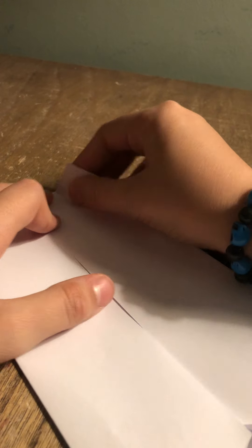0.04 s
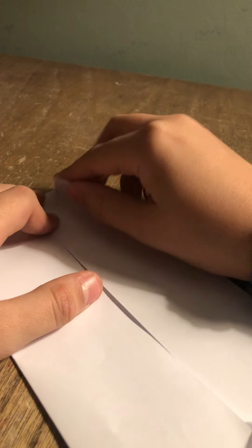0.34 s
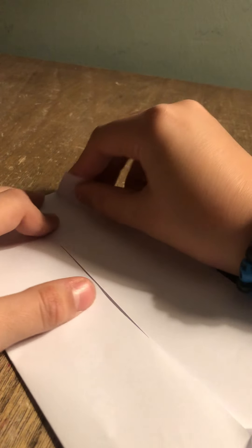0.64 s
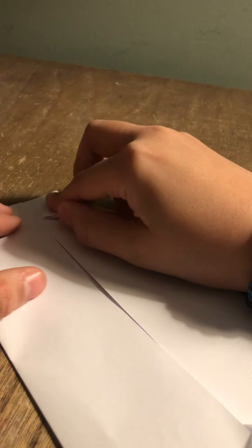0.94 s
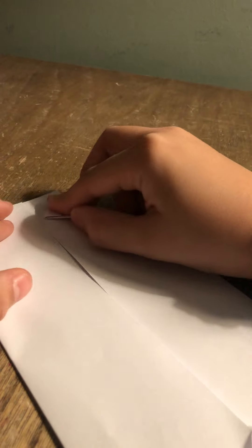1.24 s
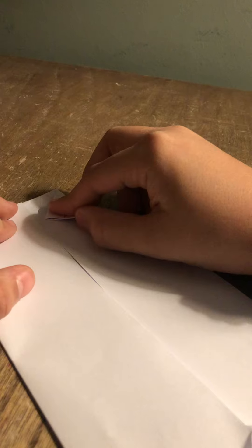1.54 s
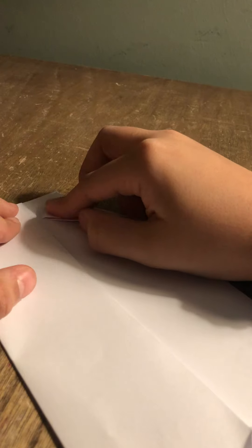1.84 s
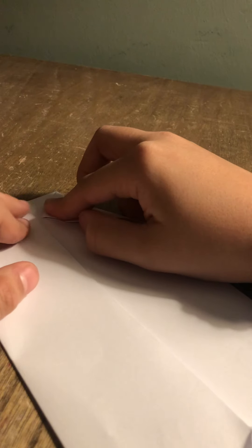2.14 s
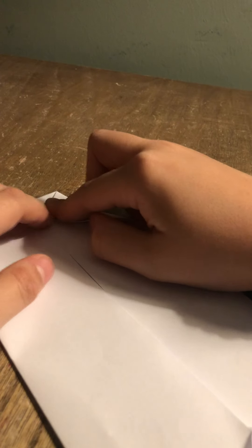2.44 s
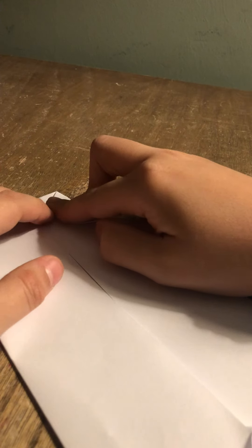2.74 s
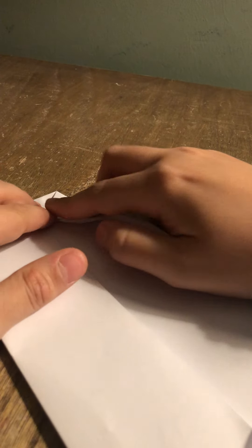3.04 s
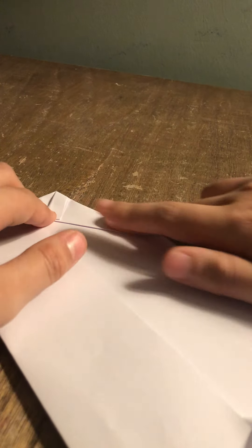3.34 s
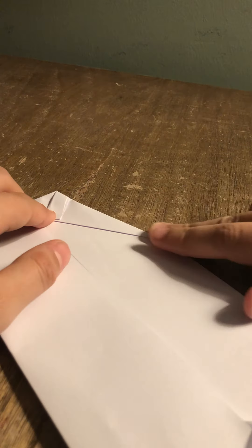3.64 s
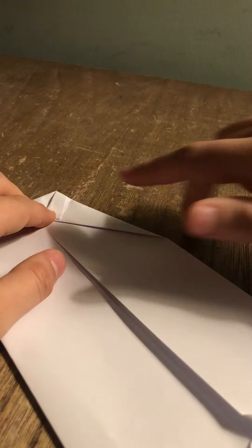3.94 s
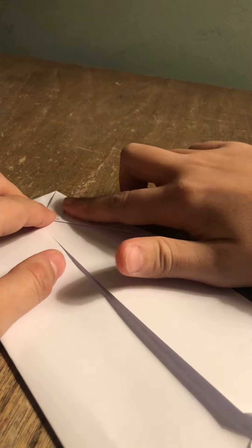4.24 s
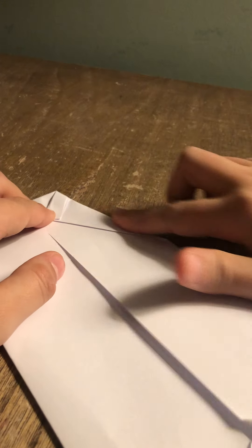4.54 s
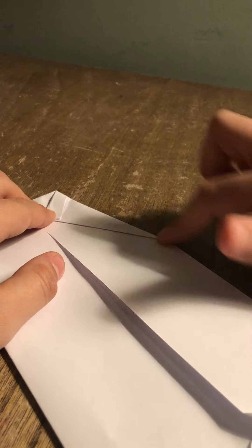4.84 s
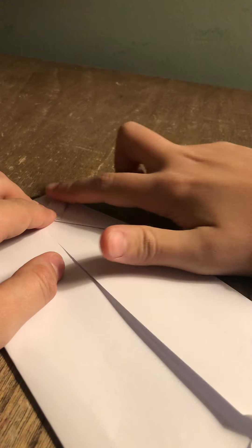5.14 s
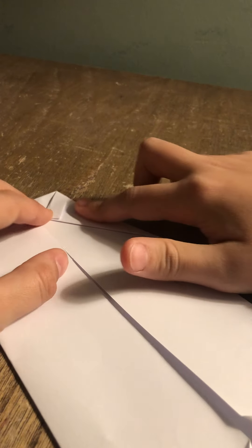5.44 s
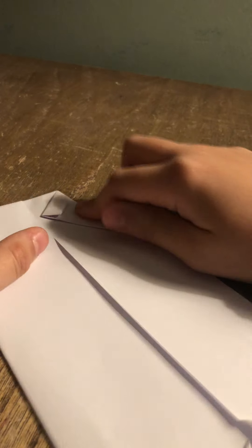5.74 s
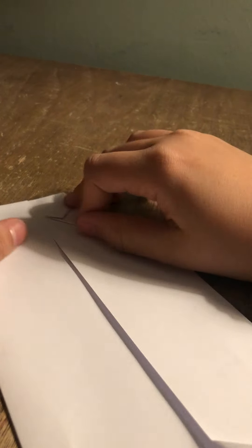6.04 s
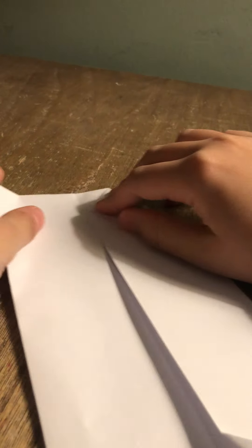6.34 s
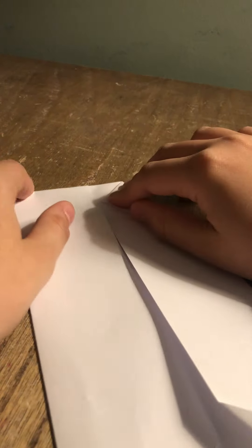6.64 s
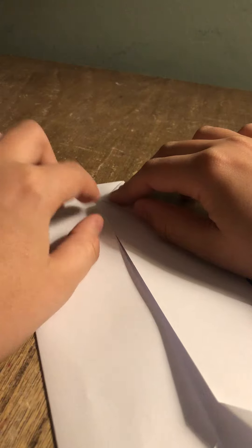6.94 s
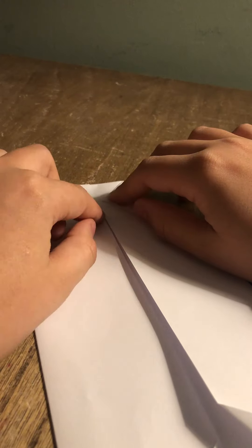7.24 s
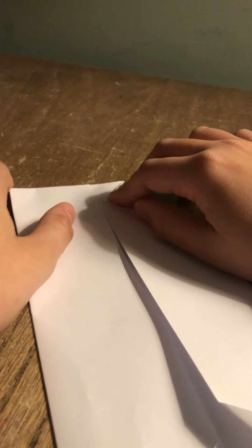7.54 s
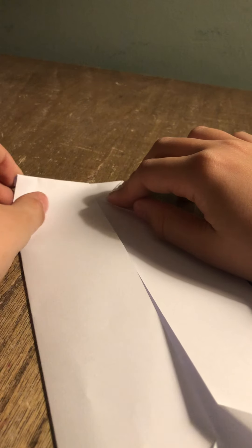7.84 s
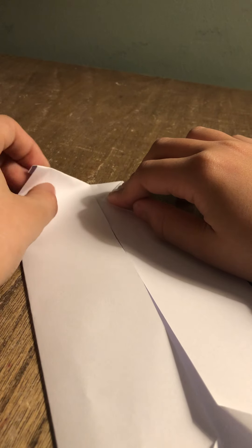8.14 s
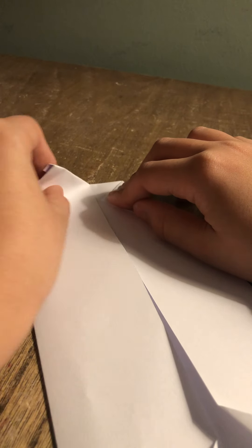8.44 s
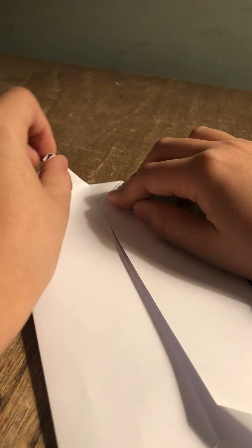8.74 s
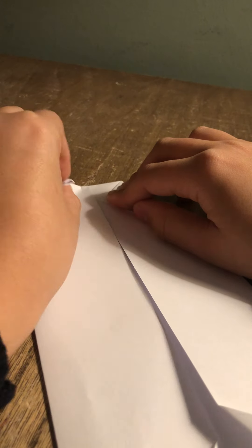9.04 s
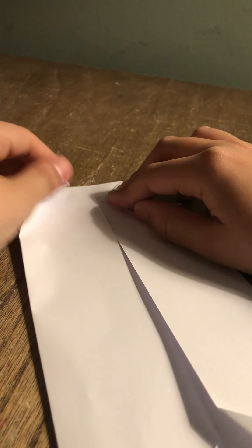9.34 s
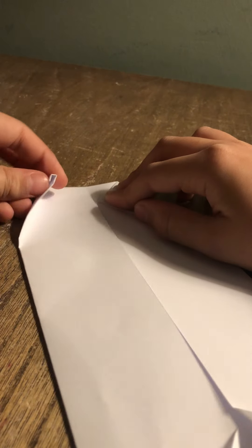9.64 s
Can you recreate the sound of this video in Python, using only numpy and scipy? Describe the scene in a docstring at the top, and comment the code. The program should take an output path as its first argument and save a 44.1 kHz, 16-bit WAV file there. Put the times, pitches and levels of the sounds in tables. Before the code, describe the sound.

From the start, fingertips slide over a sheet of paper in short, soft strokes, with rustling, small crinkles and dull hand bumps on a wooden table. At about 2.4 seconds the paper buckles with a sharp snap and pop, the loudest crack. After more light rubbing, a finger pressed along the crease makes one prominent squeak from 3.5 to 3.9 seconds, wavering, dipping in pitch and rising again. From 4 to 6 seconds come smoothing swishes, low rubbing and a few soft thumps. Crisp crackles stand out around 6.5 and 7.2 seconds. From 8 seconds to nearly 10 the folding gets busier, with continuous rustling, a clear pop at 8.6, another snap at 8.9, and further crinkles and light bumps. The sound is close and mono, in a small room with faint low background noise.

```python
"""Fingertips slide over a sheet of paper on a wooden table: skin hisses, the sheet rustles, the wood rubs. Two
hands fold the sheet. They bump the table top; the paper crinkles, buckles with snaps, and pops as bulges flip
over. A brushed flap sings in its resonances, and rings on after the loudest snap. Once, a finger pressed along
the crease sticks and slips, and the paper squeaks. Small room, close mono microphone."""
import sys
import numpy as np
from scipy import signal
from scipy.fft import rfft, irfft
from scipy.io import wavfile
from scipy.ndimage import uniform_filter1d

SR = 44100
rng = np.random.default_rng(int(sys.argv[2]) if len(sys.argv) > 2 else 0)


def waveform_to_disk(signal):
    """Save audio, clipped to [-1, 1], as 16-bit WAV at the path in sys.argv[1]."""
    frames = np.transpose(np.atleast_2d(signal))
    scaled = np.clip(frames, -1, 1) * 32767
    samples = np.round(scaled).astype(np.int16)
    wavfile.write(sys.argv[1], SR, samples)


N = 431727
TIME_S = np.arange(N) / SR

# finger strokes: (start [s], length [s], top speed at [0-1], relative hiss [dB], rustle [dB], rub [dB])
STROKES = [(0.016, 0.063, 0.73, -56, -62.5, -66.5), (0.067, .1, .7, -65, -67, -64),
           (0.152, .21, 0.22, -53, -53, -60), (0.357, .16, 0.38, -55.5, -56.5, -65),
           (.505, 0.094, 0.5, -68, -66.5, -59), (0.575, 0.21, 0.86, -62.5, -67, -72),
           (.728, 0.074, 0.16, -50.5, -54.5, -57), (0.791, 0.17, .5, -49, -52.5, -60.5),
           (0.939, 0.22, 0.3, -61, -61.5, -63), (1.142, 0.29, 0.46, -62, -58.5, -65.5),
           (1.434, 0.36, 0.42, -79, -70, -67), (1.75, 0.14, 0.1, -65, -64.5, -68.5),
           (1.956, 0.15, 0.7, -68, -70, -67), (2.148, 0.13, 0.06, -62, -66.5, -72),
           (2.261, 0.31, 0.76, -60.5, -61, -66.5), (2.68, 0.21, .35, -64, -68, -78),
           (2.924, 0.31, .85, -61, -60.5, -62), (3.233, .13, 0.51, -52.5, -58.5, -55),
           (3.312, .32, 0.62, -59, -60.5, -58), (3.899, 0.21, 0.7, -77, -83, -79),
           (4.087, .08, 0.44, -50.5, -64, -49.5), (4.14, 0.16, 0.22, -53, -60.5, -60.5),
           (4.348, 0.22, 0.72, -53, -63.5, -59.5), (4.459, 0.084, 0.76, -59, -60, -45),
           (4.522, 0.17, 0.5, -51, -61, -48), (4.659, 0.2, 0.25, -56.5, -65, -59.5),
           (5.041, 0.073, 0.32, -56, -62, -66), (5.1, 0.11, 0.6, -55.5, -59, -71),
           (5.25, 0.36, 0.61, -55.5, -63.5, -60.5), (5.572, 0.35, 0.1, -55.5, -64, -59.5),
           (5.776, 0.1, 0.3, -49.5, -49.5, -50.5), (5.85, 0.13, .35, -59, -62, -53),
           (5.952, 0.26, 0.24, -58, -57.5, -55), (6.127, 0.37, 0.36, -48, -51, -62),
           (6.468, 0.052, 0.73, -45, -47.5, -50.5), (6.517, 0.15, 0.5, -58.5, -60, -71),
           (6.79, 0.31, 0.13, -64, -69.5, -72), (7.35, 0.048, .35, -56.5, -69, -82),
           (7.387, 0.12, .65, -57.5, -66, -75), (7.512, 0.087, .2, -64.5, -73, -60.5),
           (7.64, .2, 0.3, -64, -67, -72), (7.733, 0.16, 0.05, -70, -66, -55.5),
           (7.838, 0.2, 0.32, -61, -59, -65), (8.049, 0.22, 0.1, -56, -56, -69),
           (8.133, 0.2, .55, -57.5, -58, -67), (8.324, 0.14, 0.2, -56.5, -56, -73),
           (8.435, 0.16, .7, -63, -56, -67), (8.55, 0.067, 0.7, -46, -48.5, -67),
           (8.65, 0.091, 0.4, -58, -55, -68), (8.79, 0.11, 0.25, -60, -54, -66),
           (8.718, 0.077, 0.7, -57, -45, -59), (8.889, 0.078, 0.35, -56, -56.5, -56.5),
           (8.95, .09, 0.3, -65, -64, -69), (9.039, 0.13, 0.1, -57.5, -54.5, -74),
           (9.12, 0.31, 0.25, -61, -59.5, -65), (9.306, 0.063, 0.86, -52, -55, -58),
           (9.36, 0.24, 0.3, -64, -59.5, -59.5), (9.49, 0.21, 0.7, -58.5, -57, -58),
           (9.63, 0.32, 0.66, -57.5, -56, -54)]
# hands holding the sheet: (start [s], end [s], relative rustle [dB])
HOLDS = [(.03, 1.417, -71.5), (1.567, 3.9, -71.5), (5.265, 7.075, -70.5), (7.41, 9.82, -68)]
# hands landing on the table: (time [s], relative level [dB], contact softness [s])
BUMPS = [(.06, -55, 0.00063), (.167, -52, .00074), (0.215, -51, 0.0032), (.468, -55, 0.00064),
         (.766, -46.5, 0.0024), (1.045, -49.5, 0.0032), (1.17, -52, 0.00088), (1.35, -57, 0.0015),
         (1.77, -47.5, 0.0024), (2.167, -50, 0.0051), (2.423, -42.5, 0.0015), (2.715, -58.5, 0.0011),
         (4.112, -46, 0.0043), (4.232, -46.5, 0.0043), (4.261, -41.5, 0.0022), (5.055, -47, 0.0014),
         (5.16, -60, .0027), (5.755, -46, 0.0066), (5.885, -44.5, .0032), (6.016, -50, .0017),
         (6.125, -47.5, 0.0011), (6.506, -51.5, 0.001), (7.127, -62, .0011), (7.53, -48.5, 0.0044),
         (7.575, -52, 0.0048), (7.755, -50, 0.0008), (8.905, -50, 0.00022), (9.119, -55.5, 0.0042),
         (9.255, -57, 0.002), (9.611, -49.5, 0.00081), (9.699, -50, .0007), (9.743, -51, 0.00088)]
# table top modes: (frequency [Hz], relative level [dB], t60 [s])
TABLE_MODES = [(63.4, -10, .22), (102.7, -1.5, 0.29), (146.5, -5, 0.13), (180, -3.5, 0.072),
               (226.5, -8.5, 0.31), (309, -0.5, .08), (352.7, -3, 0.18)]
# sheet buckling: (time [s], relative level [dB], crumple time [s], tilt above 1 kHz [dB/octave])
SNAPS = [(.062, -47, 0.0016, -6), (.149, -51, 0.00072, -4), (.163, -44, 0.0028, -9.5),
         (.248, -34.5, .0027, 16), (.524, -51.5, 0.0031, -8), (.736, -48, 0.0029, 2),
         (.757, -44.5, 0.0025, -15), (1.351, -48.5, 0.0046, -6), (1.619, -58.5, 0.0039, -7),
         (1.764, -50.5, .004, 13), (2.05, -58, 0.0033, -4), (2.162, -47.5, .0056, 9.5),
         (2.285, -58, 0.0023, -6), (2.385, -48, .0049, 6), (2.4147, -21, 0.00054, 0.5),
         (2.664, -61, .002, 1), (2.691, -55.5, .001, .5), (2.765, -58, 0.0011, 0),
         (4.918, -48.5, 0.0045, 3), (4.924, -47, 0.0031, 7), (5.17, -45.5, .003, 2),
         (5.538, -46.5, 0.0033, -3), (5.782, -50, 0.0041, -3), (5.968, -47.5, 0.0011, -2.5),
         (6.013, -47, .0009, -12.5), (6.345, -41, 0.0013, -2.5), (6.475, -49, 0.00055, 5),
         (6.487, -39, .0022, 1), (6.5, -35, 0.0042, 0), (6.661, -49.5, 0.0043, 0),
         (6.805, -51, 0.0075, 7.5), (7.031, -49.5, 0.0037, -0.5), (7.125, -43.5, 0.0033, -.5),
         (7.139, -57, .0022, -10), (7.214, -60, .002, 7), (7.218, -57, 0.0022, 1),
         (7.224, -38.5, 0.0021, 10), (7.226, -45.5, 0.0044, -1.5), (7.303, -58, 0.0031, 5.5),
         (7.642, -43, 0.0016, 0), (7.993, -53.5, 0.00082, -5.5), (8.566, -51, 0.0028, -3),
         (8.6045, -33, 0.0012, -6), (8.662, -50.5, 0.00043, -5.5), (8.758, -45, 0.0027, -8.5),
         (8.781, -42, 0.0033, 0), (8.898, -38, 0.0017, 4), (8.994, -44.5, 0.0024, 7),
         (9.096, -47, .0036, -1), (9.121, -54, .0021, 2), (9.462, -46, .0047, 11),
         (9.515, -44.5, 0.0081, -2.5), (9.711, -44, 0.0007, -5.5)]
# bulges flipping over: (time [s], level [dB], pitch [Hz])
POPS = [(.163, -57, 910), (0.758, -59, 885), (2.4145, -28.5, 3620), (2.4162, -37, 1440), (2.932, -60, 614),
        (3.287, -45, 490), (4.06, -56.5, 480), (4.470, -48, 1150), (4.832, -61, 905), (5.047, -49.5, 460),
        (5.54, -50, 1480), (5.729, -50, 3000), (6.867, -52, 950), (7.518, -57, 1550), (7.564, -60, 1100),
        (8.605, -35, 1580), (8.899, -45.5, 1250), (8.898, -46, 5760), (9.063, -53.5, 1540),
        (9.342, -50, 1330)]
# fingertip on the raised flap, and (first row) the flap ringing on after the loudest snap: (start [s], length
# [s], top speed at [0-1], level [dB])
BRUSHES = [(2.412, .09, .1, -64), (4.09, 0.21, 0.63, -59.5), (5.04, .16, 0.86, -60)]
# flap resonances: (frequency [Hz], width [Hz], relative level [dB])
FLAP_MODES = [(4000, 230, 3), (5420, 550, 3.5)]
# finger along the crease, its speed setting the slip rate: (time [s], slip rate [Hz])
SLIP_RATE = [(3.543, 486), (3.58, 464), (3.605, 487.3), (3.627, 479), (3.645, 390), (3.668, 355),
             (3.685, 411.5), (3.712, 441.2), (3.732, 401.5), (3.766, 245.4), (3.791, 238.6), (3.806, 339),
             (3.82, 405), (3.85, 447.6), (3.876, 482), (3.911, 485)]

# source spectra: (frequency [Hz], relative level [dB])
SKIN_HISS = [(400, -9.5), (1500, -20), (4000, -7.5), (7000, 1), (9500, -0.5), (12500, 1.5), (16000, -4)]
SHEET_RUSTLE = [(200, -11.5), (700, -3.5), (1400, -2), (2300, -2), (3300, 0.5), (4300, 1.5), (5700, -1),
                (6800, -3.5), (12000, -12)]
TABLE_RUB = [(20, -32), (55, -3.5), (100, 7), (170, 2), (250, 2.5), (340, 3), (600, -3), (1200, -8.5),
             (2000, -15), (5000, -37.5)]
BUCKLE_CRACK = [(100, -12.5), (500, -8), (900, -7), (1400, -5.5), (2300, -2.5), (3000, 0.5), (4300, 0),
                (5800, 2), (6800, -1), (8500, -1), (13000, -5.5), (16000, -12)]
SLIP_BUZZ = [(300, 0), (550, 5), (750, 5), (950, 6), (1300, 0), (1700, -7.5), (2400, -13.5), (3200, -22),
             (4300, -25), (6000, -36), (12000, -37)]
FIBRE_RASP = [(300, -12), (1000, 7), (2500, -6.5), (4200, -7.5), (6000, 0), (8000, 0.5), (10000, -2),
              (12000, -1), (16000, -9.5)]
ROOM_AIR = [(20, 3), (60, 19), (110, 19.5), (250, 7), (600, 1), (1500, -3.5), (4000, -10.5), (16000, -15.5)]

# nearest surfaces: (delay [s], level [dB])
ECHOES = [(.0023, -22.5), (.0068, -29), (0.0129, -19)]
# room decay: (frequency [Hz], t60 [s])
ROOM_T60 = [(100, .35), (500, .37), (1500, .28), (5000, .32), (10000, .25), (16000, .18)]


def amp(db):
    """Decibels to gain."""
    return 10 ** (np.asarray(db) / 20)


def unit_rms(x):
    """Scales to rms 1."""
    return x / np.sqrt(np.mean(x ** 2) + 1e-20)


def lookup(table, hz):
    """Interpolates on a log-frequency axis."""
    table_hz, value = np.transpose(table)
    return np.interp(np.log(hz + 1), np.log(table_hz + 1), value)


def add(mix, at_s, sound):
    """Mixes a sound in place."""
    part = mix[round(at_s * SR):][:len(sound)]
    part += sound[:len(part)]


def colour(x, spectrum, db_per_octave=0, size=2048):
    """Minimum-phase filter, tilted above 1 kHz."""
    hz = abs(np.fft.fftfreq(size, 1 / SR))
    gain = amp(lookup(spectrum, hz) + db_per_octave * np.log2(np.maximum(hz / 1000, 1)))
    taps = np.fft.ifft(np.exp(np.conj(signal.hilbert(np.log(gain))))).real
    return signal.oaconvolve(x, taps[:size // 2])[:len(x)]


def resonate(x, hz, width_hz):
    """Two equal band-pass resonators in series."""
    b, a = signal.iirpeak(hz, hz / width_hz, fs=SR)
    return signal.lfilter(b, a, signal.lfilter(b, a, x))


def wander(n, rate_hz):
    """Smooth random drift, rms 1."""
    hz = np.fft.rfftfreq(n, 1 / SR)
    return unit_rms(irfft(rfft(rng.standard_normal(n)) * np.exp(-(hz / rate_hz) ** 2), n))


def stroke_gain(rows, exponent):
    """Friction grows as a power of finger speed; each stroke speeds up, then stops."""
    power = np.zeros(N)
    for start_s, length_s, top, db in rows:
        progress = np.arange(0, length_s, 1 / SR) / length_s
        speed = np.sin(np.pi / 2 * np.interp(progress, [0, top, 1], [0, 1, 0]))
        add(power, start_s, (amp(db) * speed ** exponent) ** 2)
    return np.sqrt(power)


def bending(x, depth_db=1.5, size=512):
    """The sheet bends and its upper resonances drift."""
    hz, _, bands = signal.stft(x, SR, nperseg=size)
    drift = rng.standard_normal(bands.shape)
    for _ in range(2):
        drift = uniform_filter1d(uniform_filter1d(drift, size=7, axis=0), size=16, axis=1)
    treble = np.minimum(hz / 2000, 1)[:, None]
    return signal.istft(bands * amp(depth_db * treble * unit_rms(drift)), nperseg=size)[1][:N]


def friction(spectrum, ticks_per_s, spread_db, tick_share, sway_db, sway_hz):
    """Fibres brush past each other; some catch and let go with a tick."""
    sizes = amp(spread_db * np.minimum(rng.exponential(1, N), 4))
    ticks = sizes * rng.choice([-1, 1], N) * (rng.random(N) < ticks_per_s / SR)
    force = np.sqrt(tick_share) * unit_rms(ticks) + np.sqrt(1 - tick_share) * rng.standard_normal(N)
    force *= amp(sway_db * wander(N, sway_hz))
    return unit_rms(bending(colour(force, spectrum)))


def sliding():
    """Fine hiss at the skin, coarser rustle and crinkles in the sheet, dull rub on the table."""
    start_s, length_s, top, hiss_db, rustle_db, rub_db = np.transpose(STROKES)
    skin = stroke_gain(zip(start_s, length_s, top, hiss_db), exponent=0.89)
    sheet = stroke_gain(zip(start_s, length_s, top, rustle_db), exponent=0.53)
    table = stroke_gain(zip(start_s, length_s, top, rub_db), exponent=0.57)
    held = hold_gain()
    flex = np.hypot(sheet, held)
    hiss = friction(SKIN_HISS, ticks_per_s=1000, spread_db=2, tick_share=0.11, sway_db=0.94, sway_hz=88)
    rustle = friction(SHEET_RUSTLE, ticks_per_s=770, spread_db=-1, tick_share=0.14,
                      sway_db=2, sway_hz=69.4)
    rub = friction(TABLE_RUB, ticks_per_s=300, spread_db=0.5, tick_share=0.15, sway_db=2.5, sway_hz=35)
    hiss *= np.hypot(skin, amp(-4) * held)
    rustle *= amp(-1.5) * flex
    rub *= amp(0.5) * np.hypot(table, amp(-2) * held)
    return hiss + rustle + rub + crinkles(flex)


def hold_gain(fade_s=0.027):
    """Faint friction: hands never hold the sheet quite still."""
    return sum(amp(db) * np.clip(np.minimum(TIME_S - start_s, end_s - TIME_S) / fade_s, 0, 1)
               for start_s, end_s, db in HOLDS)


def crinkles(flex, per_s=22, relative_db=-10, spread_db=3, crumple_s=0.002):
    """Tiny random buckles, as strong as the sheet is flexed."""
    t = np.arange(SR // 50) / SR
    clicks = amp(spread_db * rng.standard_normal(N)) * (rng.random(N) < per_s / SR)
    bursts = signal.oaconvolve(clicks, np.exp(-t / crumple_s))[:N] * rng.standard_normal(N)
    return amp(relative_db) * flex * unit_rms(colour(bursts, BUCKLE_CRACK))


def bumps(trim_db=-1, scuff=0.36, settle_s=0.013):
    """A soft push and the settling skin ring the table top."""
    out, t = np.zeros(N), np.arange(SR // 2) / SR
    for at_s, db, soft_s in BUMPS:
        spot = amp(3.05 * rng.standard_normal(len(TABLE_MODES)))  # each spot weights the modes anew
        ring = sum(weight * amp(mode_db - 60 * t / t60_s) * np.cos(2 * np.pi * hz * t)
                   for weight, (hz, mode_db, t60_s) in zip(spot, TABLE_MODES))
        force = scuff * rng.standard_normal(len(t)) * np.exp(-t / settle_s) / np.sqrt(settle_s * SR / 2)
        force[0] += 0.3
        push = signal.fftconvolve(force, t * np.exp(-2 * t / soft_s))[:len(t)]
        thud = signal.fftconvolve(push, ring)[:len(t)]
        add(out, at_s, amp(db + trim_db) * thud / np.std(thud[:SR // 25]))
    return out


def snaps(trim_db=1, grain_db=2, quick_s=0.00062, rise_share=0.34):
    """Each buckle is a sharp click that sets off an avalanche of smaller ones."""
    out, t = np.zeros(N), np.arange(2048) / SR
    # bending waves carry treble ahead of bass
    dispersion = np.exp(-2j * np.pi * np.sqrt(np.fft.rfftfreq(len(t), 1 / SR) / 200))
    for at_s, db, crumple_s, db_per_octave in SNAPS:
        grains, sizes = rng.standard_normal((2, len(t)))
        envelope = np.exp(-t / crumple_s) * (1 - np.exp(-t / (rise_share * crumple_s)))
        burst = grains * amp(grain_db * sizes) * envelope
        burst /= np.linalg.norm(burst)
        burst[0] -= (quick_s / crumple_s) ** 2  # quicker buckle, stronger first click
        crack = colour(irfft(rfft(burst) * dispersion), BUCKLE_CRACK, db_per_octave)
        crack *= np.sqrt(0.003 * SR) / np.linalg.norm(crack)  # energy of 3 ms at rms 1
        add(out, at_s, amp(db + trim_db) * crack)
    return out


def pops(width_share=0.62, settle_s=0.0056):
    """A bulge flips and rings with the air beneath: hollow if large, bright if small."""
    out, t = np.zeros(N), np.arange(2048) / SR
    for at_s, db, hz in POPS:
        flutter = 0.063 * rng.standard_normal(len(t)) * np.exp(-t / settle_s)
        flutter[0] = 1
        pop = resonate(flutter, hz, width_share * hz)
        add(out, at_s, amp(db) * pop / np.std(pop[:SR // 200]))
    return out


def flap():
    """A fingertip brushes the raised flap, and the flap rings on after the loudest snap; noise excites its
    resonances."""
    noise = rng.standard_normal(N)
    ring = sum(amp(db) * resonate(noise, hz, width_hz) for hz, width_hz, db in FLAP_MODES)
    return stroke_gain(BRUSHES, exponent=0.89) * unit_rms(ring)


def slip_buzz(t, slip_hz, cycles, unrest, flare_db=17.5, onset_db=-9, sheen_db=4, shimmer_db=2.5):
    """Each slip kicks the sheet: harmonics 2-33 of the slip rate, rms 1."""
    orders = np.arange(2, 34)[:, None]
    hz = orders * slip_hz
    db = lookup(SLIP_BUZZ, hz)
    # slips briefly shake the flap; partials near its resonance flare
    db += flare_db * np.exp(-((t - 3.722) / 0.025) ** 2 - ((hz - 4040) / 1500) ** 2)
    # weak mids until the finger digs in
    db += onset_db * np.exp(-((t - t[0]) / 0.075) ** 4 - np.log2(hz / 1670) ** 2)
    db += sheen_db * np.clip(hz / 3000 - 0.5, 0, 1) / unrest  # quick slips are sharper
    # the travelling finger favours changing partials
    db += shimmer_db * np.array([wander(len(t), 45) for _ in orders])
    gains = amp(db)
    # parts of the fingertip let go at different moments
    lag = 0.66 * rng.random(orders.shape)
    lag = lag + 0.07 * np.log(unrest) * np.array([wander(len(t), 71) for _ in orders])
    partials = gains * np.cos(2 * np.pi * (orders * cycles + lag))
    return partials.sum(0) / np.sqrt((gains ** 2).sum(0) / 2)


def squeak(attack_s=0.0095, release_s=0.026, jitter=0.0081, swing_cut_hz=314, sway_db=1):
    """Stick-slip on the crease: the fingertip swings, the sheet buzzes, its fibres rasp."""
    times_s, rates_hz = np.transpose(SLIP_RATE)
    t = np.arange(times_s[0], times_s[-1], 1 / SR)
    slip_hz = np.interp(t, times_s, rates_hz)
    contact = np.minimum((t - t[0]) / attack_s, (t[-1] - t) / release_s).clip(max=1)
    press_db = 6.5 * np.exp(-((t - 3.668) / 0.031) ** 2)  # hardest part way along
    ease_db = -21 * (t - t[0])  # the finger moves away
    unrest = (slip_hz.max() / slip_hz) ** 3  # slow slips are less even
    cycles = np.cumsum(slip_hz * (1 + jitter * unrest * wander(len(t), 220))) / SR
    buzz = slip_buzz(t, slip_hz, cycles, unrest) * amp(-38.5 + press_db)
    slip_pulses = 0.2 + np.exp(-(cycles % 1) / 0.29)
    rasp = unit_rms(colour(rng.standard_normal(len(t)) * slip_pulses, FIBRE_RASP))
    rasp *= amp(-45.5 + ease_db + 0.34 * press_db)
    swing = np.sqrt(2) * np.sin(2 * np.pi * cycles)
    swing /= np.sqrt(1 + (swing_cut_hz / slip_hz) ** 10)  # slow slips fail to drive it
    swing *= amp(-29.5 + ease_db + 0.51 * press_db + sway_db * wander(len(t), 45))
    out = np.zeros(N)
    add(out, t[0], contact * (swing + buzz + rasp))
    return out


def near_echoes(x):
    """Direct sound plus reflections off the table and wall."""
    return x + sum(amp(db) * np.interp(TIME_S - round(delay_s * SR) / SR, TIME_S, x, left=0)
                   for delay_s, db in ECHOES)


def room(x, size=256):
    """Diffuse tail; each band decays at its own rate."""
    hz, t, bands = signal.stft(rng.standard_normal(SR // 2), SR, nperseg=size)
    decay = amp(-60 * t / lookup(ROOM_T60, hz)[:, None])
    tail = signal.istft(bands * decay, SR, nperseg=size)[1]
    tail[:SR // 250] = 0  # 4 ms pre-delay
    return signal.fftconvolve(x, tail / np.linalg.norm(tail))[:N]


def scene():
    """Paper, table and room air, the same in both channels."""
    paper = sliding() + flap() + snaps() + pops()
    crease = squeak()
    air = amp(-67) * unit_rms(colour(rng.standard_normal(N), ROOM_AIR))
    reverb = room(amp(-15) * paper + amp(-13) * crease)
    mono = near_echoes(paper) + crease + bumps() + reverb + air
    return np.array([mono, mono])


def record(dry, low_cut_hz=54, high_cut_hz=16050):
    """Microphone bass roll-off, then a steep band limit."""
    highpass = signal.butter(4, low_cut_hz, "highpass", fs=SR, output="sos")
    lowpass = signal.firwin(301, high_cut_hz, window=("kaiser", 8), fs=SR)
    return signal.oaconvolve(signal.sosfilt(highpass, dry), lowpass[None], "same")


dry = scene()
out = record(dry)
waveform_to_disk(out)
```